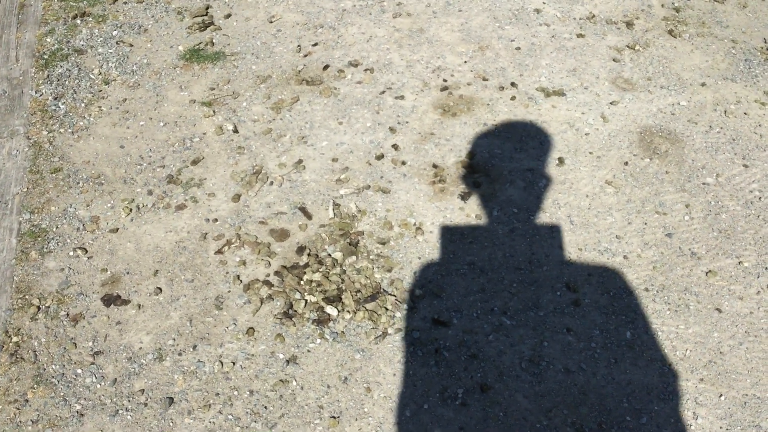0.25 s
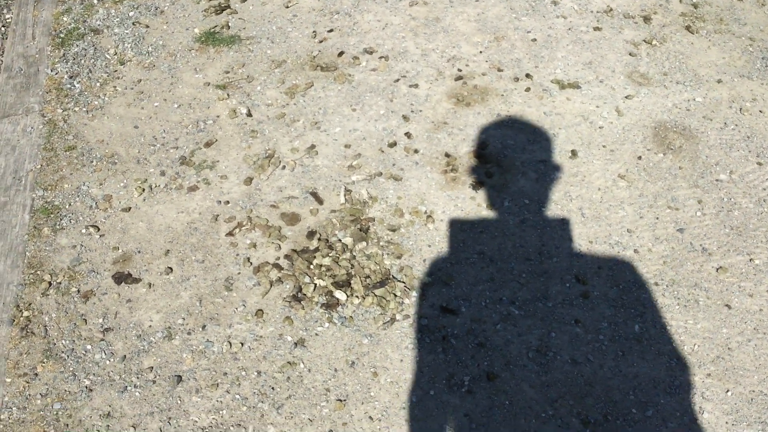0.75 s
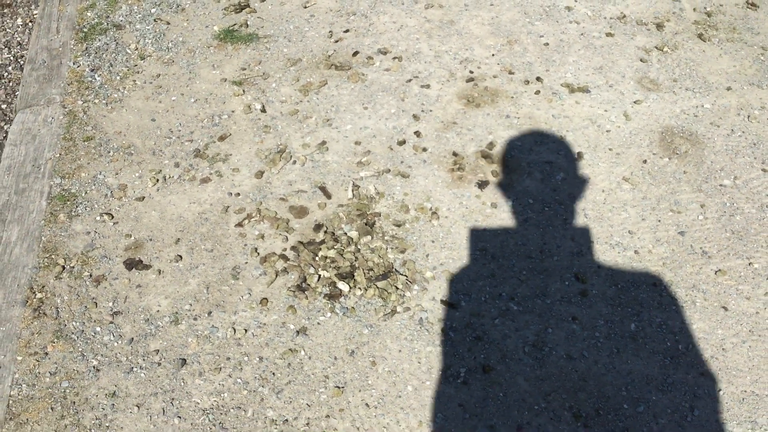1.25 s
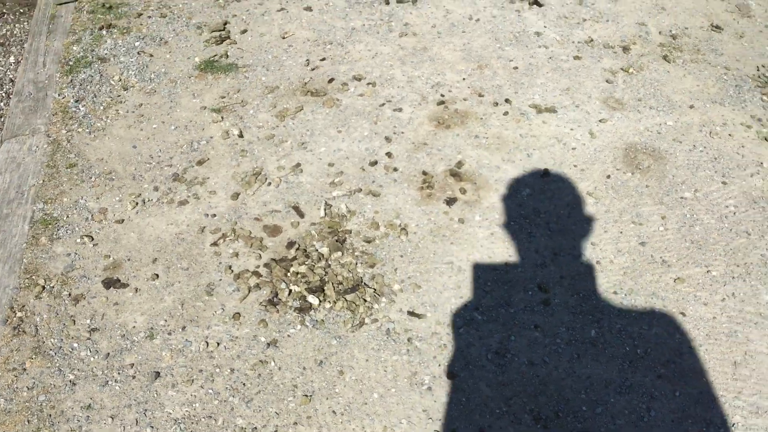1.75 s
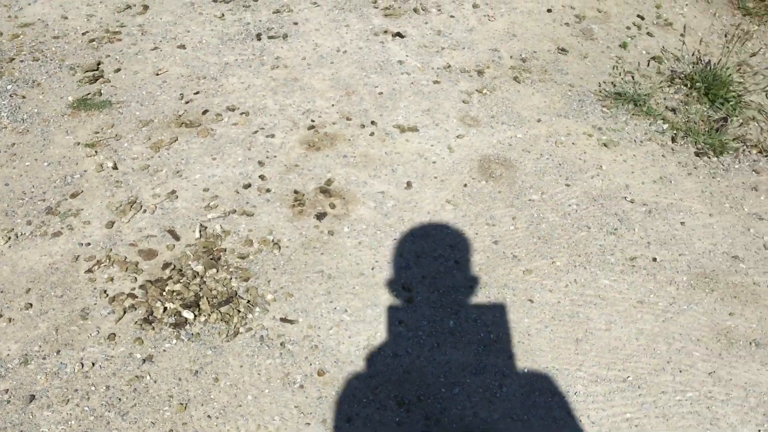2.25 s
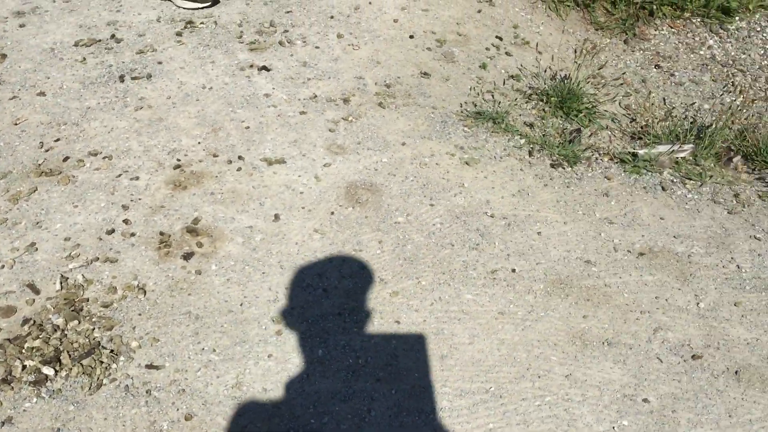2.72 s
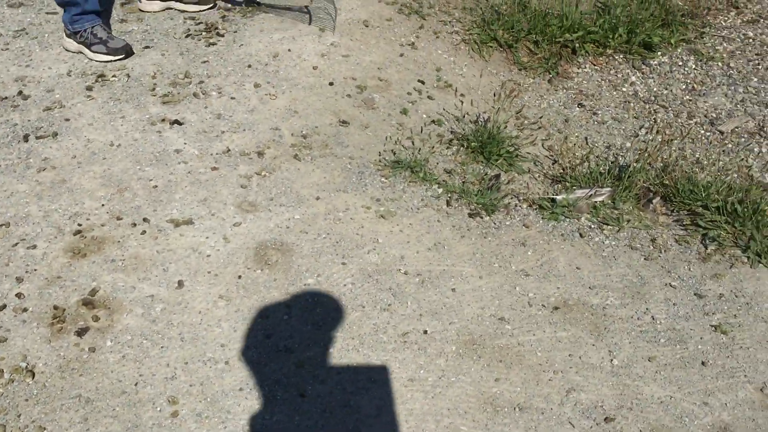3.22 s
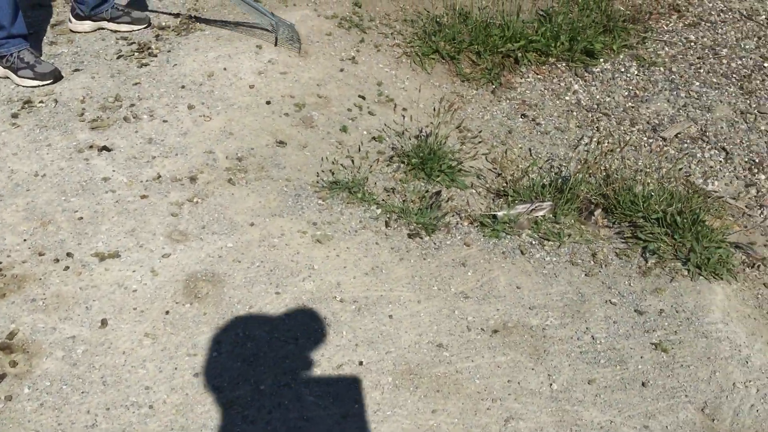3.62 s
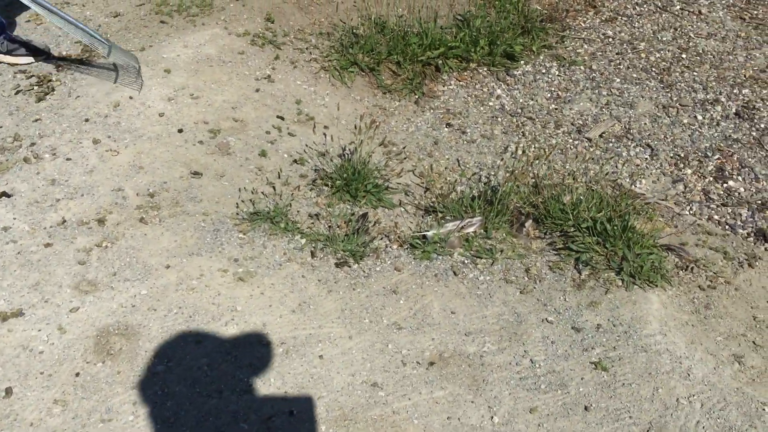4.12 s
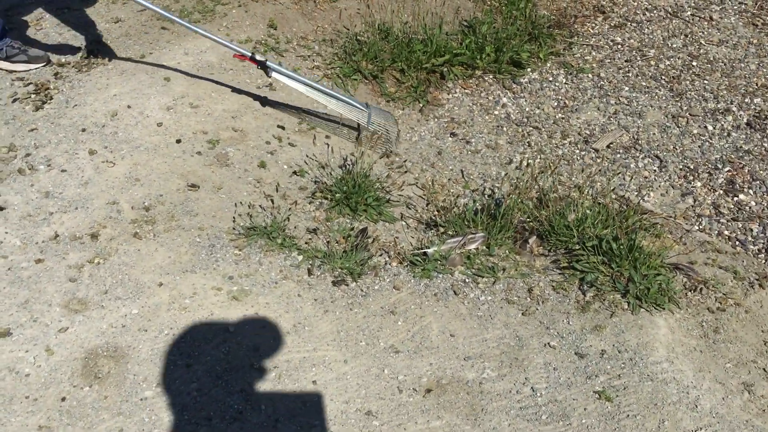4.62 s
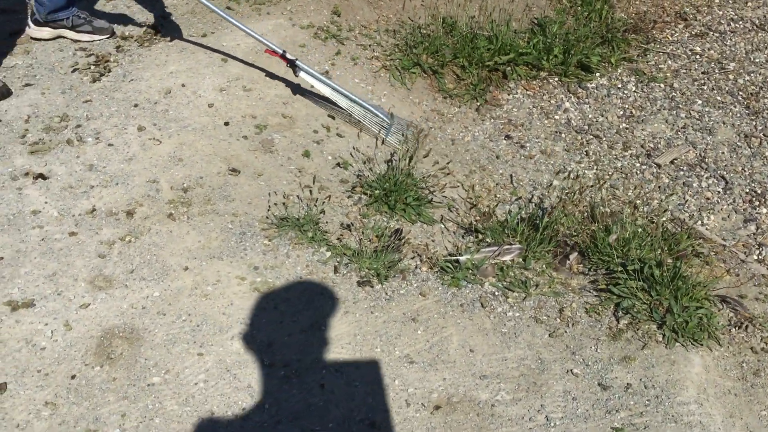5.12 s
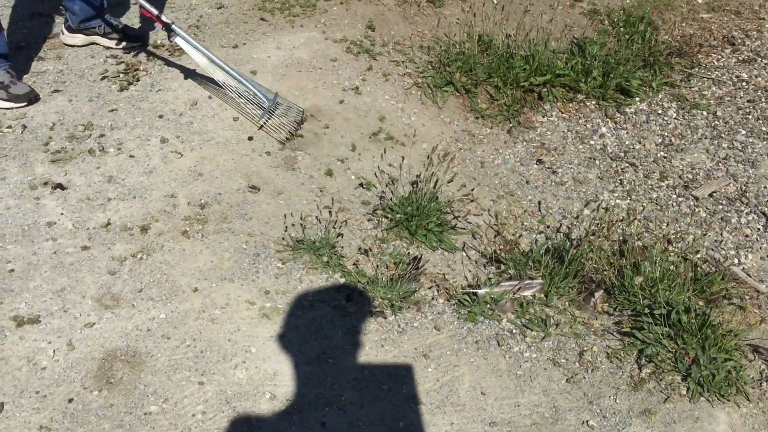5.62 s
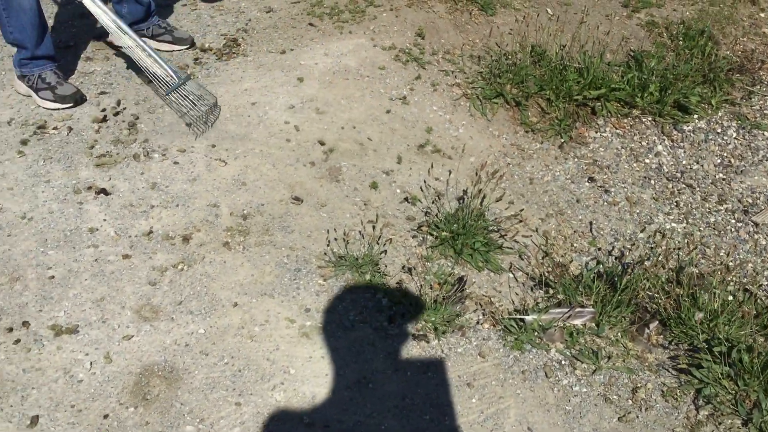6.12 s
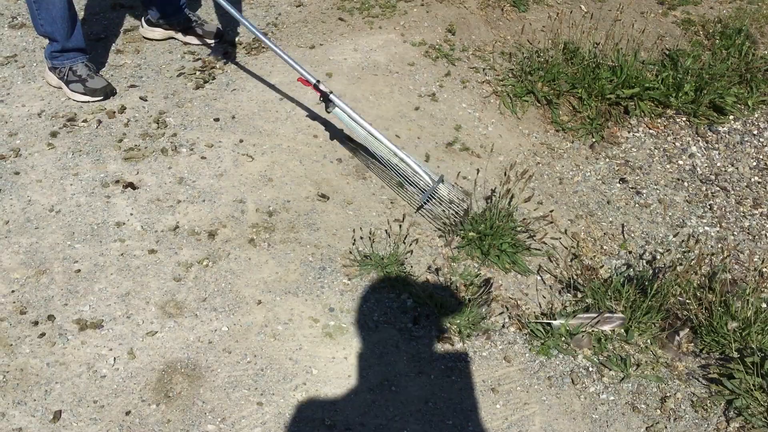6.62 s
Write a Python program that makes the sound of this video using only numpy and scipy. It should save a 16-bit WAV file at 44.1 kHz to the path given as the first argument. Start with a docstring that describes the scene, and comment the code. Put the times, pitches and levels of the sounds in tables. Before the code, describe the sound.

Outdoors on a dry gravel path, a steel fan rake is dragged in repeated gritty strokes, its thin tines rasping, chattering and ringing. Between pulls, pebbles drop and settle, stones click and shoes crunch briefly. The hand-held camera picks up dull bumps and a low wind rumble that strengthens late, when a faint distant whistle and one tiny bird chirp appear.

```python
"""A steel fan rake is pulled over a dry gravel path, stroke after stroke: impacts of grit and stones
excite drifting tine resonances, and loose tines chatter and sing. Pebbles ring as they roll, drop and settle.
Shoes crush grains, stones click, a foot thuds once, and the hand-held camera is bumped and knocks, as decaying
tones. Filtered noise gives open air and light wind, which grows towards the end; a distant whistle and one bird
chirp come late."""
import sys
import numpy as np
from scipy import signal
from scipy.fft import rfft, irfft, next_fast_len
from scipy.io import wavfile
from scipy.ndimage import uniform_filter1d, map_coordinates

SR = 44100
rng = np.random.default_rng(int(sys.argv[2]) if len(sys.argv) > 2 else 0)


def unload_audio(sound):
    """Save the sound as a 16-bit wav file, at the path given as the first command line argument."""
    columns = np.transpose(np.atleast_2d(sound))
    # keep every value between -1 and 1, then stretch to whole-number steps
    steps = np.round(np.clip(columns, -1, 1) * 32767)
    wavfile.write(sys.argv[1], SR, steps.astype(np.int16))


N = 302526  # length [samples]

# Pulls of the rake: (landing [s], bite [s], lift [s], start of coming to rest [s], light touch [dB],
# bite [dB], end of pull [dB], rattle [dB], fine sand re middle band [dB], coarse stones re middle band [dB])
RAKE_PULLS = [(-0.3, -0.05, 0.12, 0.44, -60, -47, -44, -63, -5, -2),
              (0.762, 1.065, 1.564, 1.833, -69.5, -59.5, -45, -61, -4.5, -2),
              (2.252, 2.453, 2.89, 3.3, -62.5, -55.5, -47, -67.5, -3.5, -4),
              (3.481, 3.653, 3.911, 4.38, -63, -53, -49.5, -63.5, -4.5, -2),
              (4.775, 5.178, 6.003, 6.24, -68, -55.5, -51, -73, -4.5, -0.5),
              (6.7, 7.0, 7.45, 7.28, -64, -55, -50, -66, -4.5, -1)]
# Bending resonances of the tines, one table a pull, the last shared by two:
# (centre [Hz], width [Hz], relative level [dB])
TINE_BEND_A = [(1710, 140, -4), (2340, 84, -2), (2910, 160, 3), (3940, 320, 0.5), (5470, 78, 0.5),
               (6520, 79, -1), (9300, 160, -7), (11340, 31, -4), (14100, 67, 2), (15500, 90, 9)]
TINE_BEND_B = [(1860, 50, -1), (2260, 42, -9), (2935, 150, 3.5), (3990, 200, 1), (5450, 50, 1.5),
               (6630, 290, -8), (9450, 45, -6), (10900, 120, -17), (14100, 180, -10), (14900, 79, -1)]
TINE_BEND_C = [(2860, 99, -5), (3640, 110, -1.5), (5630, 46, -7), (5970, 160, -1.5), (6470, 67, 1.5),
               (6960, 140, -16), (7560, 45, -22), (7700, 48, -5), (9300, 160, -4.5), (10760, 38, -7),
               (15400, 350, -2)]
TINE_BEND_D = [(2510, 28, -5), (2910, 53, 3.5), (4000, 130, -7), (5460, 43, -13), (6140, 73, -5),
               (8000, 36, -14), (8050, 47, -20), (9430, 190, -7.5), (14500, 170, -10), (15600, 240, -2)]
TINE_BEND_E = [(2440, 78, 3), (2630, 61, -19), (4595, 63, -1), (5730, 27, -2), (6080, 54, -1.5),
               (6480, 150, -2.5), (7030, 32, -9), (7600, 97, -2.5), (9330, 580, -6), (12800, 49, -39),
               (14300, 380, -9), (15200, 120, 3.5)]
# Spectrum of the gravel patch under each pull, the last shared by two: (frequency [Hz], relative gain [dB])
GRAVEL_PATCH_A = [(410, -45), (700, -16), (897, -23), (957, -36), (1100, -25), (1740, -12), (2900, -5),
                  (3180, -11), (4020, -10), (8450, -14), (15800, -9)]
GRAVEL_PATCH_B = [(410, -33), (700, -12), (983, -21.5), (1890, -2.5), (2070, -8), (2860, -2), (3970, -4.5),
                  (4340, -12), (5570, -5), (8450, -17.5), (15800, -18)]
GRAVEL_PATCH_C = [(410, -40), (700, -6.5), (851, -21), (1090, -11), (3720, -3), (6510, -11), (6950, -8),
                  (7610, -5), (8560, -10), (9380, -7), (15800, -14)]
GRAVEL_PATCH_D = [(410, -57), (700, -12), (862, -19.5), (1610, -8.5), (2550, -3.5), (3220, -6.5),
                  (5150, -17), (6100, -8.5), (8340, -14.5), (9260, -16.5), (15800, -19.5)]
GRAVEL_PATCH_E = [(410, -41), (700, -9.5), (1280, -11.5), (1380, -6.5), (2420, -2.5), (2860, -1),
                  (5350, -9), (5790, -30), (6860, -11), (12200, -7.5), (15800, -13.5)]
# Tines landing or snagging on a stone: (time [s], level [dB], hold [s])
TINE_SNAGS = [(0.105, -45.5, 0.02), (0.772, -63, 0.019), (0.845, -59, 0.0047), (0.965, -59, 0.012),
              (1.05, -52.5, 0.0075), (1.26, -49.5, 0.016), (1.428, -47, 0.022), (1.481, -46, 0.045),
              (2.254, -69, 0.011), (2.274, -59, 0.019), (2.512, -48.5, 0.02), (2.598, -49, 0.061),
              (3.488, -52.5, 0.008), (3.668, -48, 0.024), (3.778, -50.5, 0.017), (3.89, -53, 0.031),
              (4.78, -54.5, 0.011), (4.836, -60.5, 0.016), (4.917, -63, 0.024), (5.175, -57, 0.037),
              (5.83, -51, 0.0096), (5.895, -50.5, 0.028), (6.706, -56, 0.025)]
# Single tines that chatter and sing: (start [s], end [s], pitch [Hz], width [Hz], level re pull force [dB])
SINGING_TINES = [(0.1, 0.138, 2800, 250, 0), (0.99, 1.302, 1740, 300, -2.5), (1.46, 1.542, 3840, 260, -1.5),
                 (1.547, 1.877, 6620, 200, -0.5), (1.57, 1.814, 3030, 120, 0.5), (2.25, 2.78, 6540, 90, -4),
                 (2.26, 2.495, 5860, 160, -3.5), (2.254, 2.315, 3560, 200, -4),
                 (2.4, 2.65, 3920, 170, -2.5), (2.868, 3.2, 6060, 130, -25), (3.849, 3.927, 2700, 395, 3.5),
                 (4.014, 4.33, 6650, 410, -9), (5.172, 5.5, 4720, 99.4, -22), (5.206, 5.55, 5340, 60, -9.5),
                 (5.45, 6.064, 5485, 50, -6), (5.82, 6.016, 7030, 100, -3)]
# Large eddies buffeting the microphone: (time [s], relative level [dB])
BUFFET_LEVELS = [(0.0, -60), (0.05, -65), (0.11, -46), (0.5, -54), (0.61, -47.5), (0.63, -60.5),
                 (1.09, -45.5), (1.13, -61.5), (1.32, -51.5), (2.18, -49), (2.23, -59), (2.39, -43),
                 (2.46, -51.5), (4.05, -56), (4.2, -42), (4.41, -55), (5.56, -53), (5.73, -58), (5.77, -41),
                 (5.86, -53), (5.94, -42), (6.32, -49.5), (6.42, -43.5), (6.86, -45.5)]
# Small eddies fluttering at the microphone: (time [s], relative level [dB])
FLUTTER_LEVELS = [(0.0, -62.5), (0.34, -60), (1.66, -60.5), (1.83, -57), (3.46, -59.5), (5.54, -59.5),
                  (6.0, -48), (6.29, -54), (6.65, -49), (6.86, -53)]
# Spectrum of the buffeting: (frequency [Hz], relative gain [dB])
BUFFET_SPECTRUM = [(20, -48), (35, -19.5), (58, -1.5), (92, 0.5), (125, -3), (170, -12.5), (260, -27),
                   (500, -80)]
# Spectrum of the flutter: (frequency [Hz], relative gain [dB])
FLUTTER_SPECTRUM = [(80, -30.5), (140, -5), (185, -0.5), (260, -8.5), (400, -16), (650, -22), (1200, -37.5),
                    (3000, -72)]
# Spectrum of the open-air background: (frequency [Hz], relative gain [dB])
AIR_SPECTRUM = [(100, 7.5), (400, -2.5), (750, 4.5), (1200, -4.5), (2600, -6), (4000, -17), (8000, -21.5),
                (15500, -34)]
# Shoes shifting on the gravel: (start [s], end [s], relative level [dB])
SHOE_SHIFTS = [(0.544, 0.73, -80), (1.995, 2.07, -73), (2.076, 2.138, -65.5), (2.153, 2.229, -66.5),
               (2.934, 3.07, -66.5), (3.11, 3.204, -73), (3.39, 3.472, -71), (4.696, 4.777, -71),
               (6.53, 6.688, -77.5)]
# Spectrum of crushed grains and cracking stones: (frequency [Hz], relative gain [dB])
CRUNCH_SPECTRUM = [(400, -10), (1200, 1), (2300, 4), (3300, -1), (4500, -12.5), (6300, -13.5),
                   (9000, -25.5), (15500, -25.5)]
# Clicks of loose stones: (time [s], relative peak [dB], pitch [Hz], treble boost of the crack [dB])
STONE_CLICKS = [(0.5434, -58, 1410, -1), (0.5762, -54, 2220, 9), (2.0082, -52, 1240, 3),
                (2.078, -50, 2680, -1), (2.091, -49, 2740, -9), (2.176, -44, 3100, 1),
                (2.1973, -46, 2570, 11), (2.2156, -52, 2660, 0), (2.225, -53, 2710, 4),
                (3.1092, -49, 2050, -10), (3.1737, -52, 1720, 5), (3.4216, -53, 1750, 10),
                (4.352, -56, 1940, 16), (4.6923, -49, 2480, -10), (6.077, -47, 1990, 13),
                (6.221, -59, 2150, 7), (6.4009, -56, 2780, 13), (6.4974, -55, 1430, 16),
                (6.5701, -51.5, 2090, -10), (6.5948, -52, 1890, -18), (6.614, -51.5, 1980, -9),
                (6.662, -53, 1300, -2)]
# Dull bumps of the hand on the camera: (time [s], relative peak [dB], settled pitch [Hz])
HAND_BUMPS = [(0.996, -37.5, 132), (1.747, -41.5, 134), (1.968, -29.5, 193), (2.403, -38, 197),
              (2.541, -37.5, 161), (3.083, -31, 175), (3.203, -41.5, 209), (3.344, -39.5, 183),
              (3.983, -31, 177.5), (4.125, -35.5, 124), (4.589, -42, 144), (5.661, -37, 178),
              (5.685, -42, 218), (5.943, -36, 152), (6.403, -30.5, 120)]
# Dull knocks of the camera shell, and one thud of a foot (2.157 s):
# (time [s], peak before band limiting [dB], pitch [Hz])
DULL_KNOCKS = [(1.967, -48, 660), (2.157, -45, 606), (3.975, -41.5, 880), (4.045, -38, 680),
               (4.696, -44, 826), (5.556, -36, 695), (5.568, -32.5, 597), (5.578, -42, 684)]
# Bands of a faint distant whistle: (start [s], end [s], centre [Hz], half bandwidth setting [Hz], level [dB])
WHISTLE_BANDS = [(6.22, 6.508, 4380, 560, -75), (6.22, 6.48, 2920, 260, -73)]
# Path of the bird's chirp: (time [s], mean pitch [Hz], level [dB])
BIRD_CHIRP = [(6.606, 4150, -85), (6.614, 4440, -67), (6.621, 4520, -60), (6.628, 4650, -77),
              (6.655, 4600, -81)]

TOP_HZ = 15830  # upper band limit
BITE_S, LIFT_S, STILL_S = 0.085, 0.058, 0.077  # the tines dig in, spring free, come to rest
RATTLE_DB_PER_S = 31  # the rattle fades while the rake is in the air
AIRBORNE_SAND_DB, AIRBORNE_STONES_DB = -1, 0.5  # off the ground the fine hiss goes first
SNAG_ATTACK_S, SNAG_T60 = 0.003, 0.054  # rise constant and 60 dB decay time [s]


def amp(db):
    """Logarithmic level: decibels become an amplitude ratio."""
    return 10 ** (np.asarray(db) / 20)


def unit(x):
    """Normalisation: the root-mean-square amplitude becomes 1."""
    return x / np.sqrt(np.mean(x ** 2) + 1e-20)


def shape(points, hz):
    """Spectral envelope: gain through (Hz, dB) points, interpolated on a logarithmic axis."""
    f, db = np.transpose(points)
    return amp(np.interp(np.log(hz + 1), np.log(f), db))


def curves(rows):
    """Linear interpolation: one value per sample for each column after the time."""
    s, *cols = np.transpose(rows)
    return [np.interp(np.arange(N) / SR, s, c) for c in cols]


def during(start, end, fade=0.0085):
    """Time window: full between start and end, with a linear fade [s] outside each edge."""
    t = np.arange(N) / SR
    return np.clip(np.minimum(t - start, end - t) / fade + 1, 0, 1)


def wobble(rate):
    """Slow random modulation: a smooth curve through rate random knots a second."""
    knots = rng.standard_normal(int(N * rate / SR) + 4)
    return map_coordinates(knots, [np.arange(N) * rate / SR], order=2)


def colour(x, gain, size=8192):
    """Minimum-phase filtering: folding the cepstrum gives a causal response of the wanted gain."""
    cepstrum = irfft(np.log(np.maximum(gain(np.fft.rfftfreq(size, 1 / SR)), 1e-6)))
    cepstrum[1:size // 2] *= 2
    cepstrum[size // 2 + 1:] = 0
    response = irfft(np.exp(rfft(cepstrum)))
    return signal.oaconvolve(x, response)[:len(x)]


def resonance(hz, centre_hz, width_hz):
    """Damped oscillator: gain against frequency, 1 at the centre."""
    return hz * width_hz / np.hypot(centre_hz ** 2 - hz ** 2, hz * width_hz)


def ringing(drive, pitch_hz, width_hz):
    """Driven resonance: a one-pole decay in a frame turning at the gliding pitch, rms 1."""
    turn = np.exp(2j * np.pi * np.cumsum(pitch_hz) / SR)
    decay = np.exp(-np.pi * width_hz / SR)
    envelope = signal.lfilter([1], [1, -decay], drive / turn)
    return unit((turn * envelope).real)


def register(x, low_hz, high_hz, order=14):
    """Band-pass filtering: keeps the part of a sound between two frequencies."""
    size = next_fast_len(len(x) + 2048)
    hz = np.fft.rfftfreq(size, 1 / SR) + 1
    return irfft(rfft(x, size) / (1 + (low_hz / hz) ** order) / (1 + (hz / high_hz) ** order), size)[:len(x)]


def patchy(x, depth_db, size=512):
    """Shifting weak resonances: random gain in patches of frequency and time."""
    z = signal.stft(x, nperseg=size)[2]
    field = uniform_filter1d(rng.standard_normal(z.shape), size=3, axis=0)
    field = uniform_filter1d(field, size=14, axis=1)
    return signal.istft(z * amp(depth_db * unit(field)), nperseg=size)[1][:len(x)]


def contacts(rate, spread_db):
    """Random impacts: independent signed pulses of very unequal size, rate a second on average."""
    hit = rng.random(N) < rate / SR
    sign = rng.choice([-1, 1], N)
    return unit(hit * sign * amp(spread_db * np.minimum(rng.standard_normal(N), 2)))


def pebbles(rate, pitch_hz, spread, cycles, size_db, size=256):
    """Colliding pebbles: each random impact starts a short damped tone, losing 60 dB per given cycles."""
    start = np.flatnonzero(rng.random(N) < rate / SR)
    chance = np.clip(rng.standard_normal((N, 2))[start], -2, 2)  # columns: pitch, loudness
    turns = pitch_hz * np.exp(spread * chance[:, :1]) * np.arange(size) / SR
    rings = np.sin(2 * np.pi * turns) * amp(size_db * chance[:, 1:] - 60 * turns / cycles)
    places = start[:, None] + np.arange(size)
    return unit(np.bincount(places.ravel(), rings.ravel(), N + size)[:N])


def add(track, s, sound):
    """Superposition: mixes a sound in at time s."""
    part = track[max(round(s * SR), 0):][:len(sound)]
    part += sound[:len(part)]


def pull_force(pull):
    """Contact force: touch, bite, a changing pull, quick lift and fading rattle; snags jolt the tines on top."""
    land, bite, lift, still, touch_db, bite_db, pull_db, rattle_db = pull[:8]
    t, snags = np.arange(N) / SR, np.zeros(N)
    press_db, = curves([(bite - BITE_S, touch_db), (bite, bite_db), (lift, pull_db)])
    in_air_s = np.maximum(t - lift, 0)
    grip = np.exp(-(in_air_s / LIFT_S) ** 1.14)
    scrape_db = grip * press_db + (1 - grip) * (rattle_db - RATTLE_DB_PER_S * in_air_s)
    resting = np.clip((still + STILL_S - t) / STILL_S, 0, 1) ** 2
    age = t[:SR // 4]
    for s, db, held_s in TINE_SNAGS:
        decay = amp(db - 60 * np.maximum(age - held_s, 0) / SNAG_T60)
        add(snags, s, decay * (1 - np.exp(-age / SNAG_ATTACK_S)))
    return np.hypot(amp(scrape_db), snags) * resting * during(land, still + STILL_S, fade=0.0026)


def rake(forces, ring_db=-11, pebble_db=-7, clump_db=1.5, swell_db=3, flex=0.0066, patchy_db=3, uneven_db=1):
    """Impact excitation of bars: clumped grit strikes sliding tines, whose resonances swell and drift."""
    out = np.zeros(N)
    clumps = amp(clump_db * wobble(130) + uneven_db * wobble(28))
    grit = unit((contacts(rate=6000, spread_db=3.5) + 0.62 * rng.standard_normal(N)) * clumps)
    rasp = patchy(grit, patchy_db)
    rolling = pebbles(rate=1100, pitch_hz=4152, spread=0.376, cycles=170, size_db=5.5)
    rolling = amp(pebble_db) * clumps * rolling
    digging, signs = wobble(22), rng.choice([-1, 1], N)
    bends = [TINE_BEND_A, TINE_BEND_B, TINE_BEND_C, TINE_BEND_D, TINE_BEND_E, TINE_BEND_E]
    grounds = [GRAVEL_PATCH_A, GRAVEL_PATCH_B, GRAVEL_PATCH_C, GRAVEL_PATCH_D, GRAVEL_PATCH_E, GRAVEL_PATCH_E]
    for pull, force, bend, ground in zip(RAKE_PULLS, forces, bends, grounds):
        lift, (sand_db, stones_db) = pull[2], pull[8:]
        on = np.flatnonzero(force)
        airborne = np.clip((on / SR - lift) / LIFT_S, 0, 1)
        steel = rolling[on] + unit(colour(rasp[on], lambda hz: shape(ground, hz)))
        for centre_hz, width_hz, db in bend:
            # random time shifts give every tine its own grains and its own bending
            swell, drift, own = (v[(on + rng.integers(N)) % N] for v in (digging, digging, signs))
            ring = ringing(grit[on] * own, centre_hz * (1 + flex * drift), width_hz)
            steel += amp(db + ring_db + swell_db * swell) * np.sqrt(width_hz / 100) * ring
        # stones, grit and sand each sound in their own register
        bands = [(484, 3340, stones_db + AIRBORNE_STONES_DB * airborne),
                 (3405, 7780, 0),
                 (7900, 15240, sand_db + AIRBORNE_SAND_DB * airborne)]
        for low_hz, high_hz, share_db in bands:
            out[on] += force[on] * amp(share_db) * unit(register(steel, low_hz, high_hz))
    return out


def settling(level_db=-81):
    """Granular relaxation: disturbed grains keep dropping into place, heard between the strokes."""
    return amp(level_db) * pebbles(rate=290, pitch_hz=4140, spread=0.585, cycles=25, size_db=2)


def wind(buffet_db=1, flutter_db=0.5, lump_db=1.4, gust_db=0.83):
    """Turbulent pressure: eddies buffet the microphone in small gusts; smaller ones flutter above them."""
    (low_db,), (high_db,) = curves(BUFFET_LEVELS), curves(FLUTTER_LEVELS)
    lumps = lump_db * wobble(24) + gust_db * wobble(7)
    large = rng.standard_normal(N) * amp(lumps)
    small = rng.standard_normal(N) * amp(lumps + 1.94 * wobble(45))
    buffet = unit(colour(large, lambda hz: shape(BUFFET_SPECTRUM, hz)))
    flutter = unit(colour(small, lambda hz: shape(FLUTTER_SPECTRUM, hz)))
    return amp(low_db + buffet_db) * buffet + amp(high_db + flutter_db) * flutter


def open_air(level_db=-68):
    """Diffuse background: steady noise with a falling spectrum makes a faint hush."""
    return amp(level_db) * unit(colour(rng.standard_normal(N), lambda hz: shape(AIR_SPECTRUM, hz)))


def tines(force, flex=0.0058):
    """Repeated-impact resonance: loose tines chatter against the spreader bar, each near its own pitch."""
    out, taps, drift = np.zeros(N), contacts(rate=720, spread_db=3.5), wobble(25)
    for start, end, pitch_hz, width_hz, db in SINGING_TINES:
        window = during(start, end, fade=0.008)
        on = window > 0
        ring = ringing(taps[on], pitch_hz * (1 + flex * drift[on]), width_hz)
        out[on] += amp(db) * window[on] * register(ring, .8 * pitch_hz, 1.25 * pitch_hz)
    return force * out


def shedding(level_db=-68, fade_db_per_s=35):
    """Decaying impact train: small stones roll on and drop off the tines after each lift."""
    t, falling = np.arange(N) / SR, np.zeros(N)
    for _, _, lift, *_ in RAKE_PULLS:
        falling += (t > lift) * amp(level_db - fade_db_per_s * np.abs(t - lift))
    return falling * pebbles(rate=140, pitch_hz=2800, spread=0.47, cycles=20, size_db=3.5)


def shoes(level_db=1, sole_db=-1, sole_hz=580, sole_width_hz=500):
    """Granular crushing: many small impacts under shifting weight also excite a dull sole resonance."""
    weight = sum(amp(db + level_db) * during(start, end) for start, end, db in SHOE_SHIFTS)
    crush = contacts(rate=1500, spread_db=2.5) * amp(2.5 * wobble(120))
    sole = unit(colour(crush, lambda hz: resonance(hz, sole_hz, sole_width_hz) ** 2))
    grains = unit(colour(crush, lambda hz: shape(CRUNCH_SPECTRUM, hz)))
    return weight * (grains + amp(sole_db) * sole)


def clicks(click_t60=0.014, ring_t60=0.049, ring_db=-11, level_db=1):
    """Collision of solids: a stone cracks as a noise burst and rings as a brief damped tone."""
    out, t = np.zeros(N), np.arange(SR // 20) / SR
    for s, db, pitch_hz, treble_db in STONE_CLICKS:
        tone = lambda hz: shape(CRUNCH_SPECTRUM, hz) * shape([(3000, 0), (6500, treble_db)], hz)
        crack = colour(rng.standard_normal(len(t)) * amp(-60 * t / click_t60), tone)
        ring = np.sin(2 * np.pi * pitch_hz * t) * amp(ring_db - 60 * t / ring_t60)
        click = crack / np.abs(crack).max() + ring
        add(out, s, amp(db + level_db) * click / np.abs(click).max())
    return out


def bumps(cycles=7.9, rise=1.29, snap=1.6, snap_s=0.0028, level_db=-1.5):
    """Contact stiffness: a soft bump on the camera rings for a few cycles, sagging as the contact relaxes."""
    out, t = np.zeros(N), np.arange(SR // 10) / SR
    for s, db, pitch_hz in HAND_BUMPS:
        turns = np.cumsum(pitch_hz * (1 + snap * np.exp(-t / snap_s))) / SR
        onset = 1 - np.exp(-(turns / rise) ** 4)
        blow = np.sin(2 * np.pi * turns) * onset * amp(-60 * turns / cycles)
        add(out, s, amp(db + level_db) * blow / np.abs(blow).max())
    return out


def dull_knocks(cycles=8.6, rise=0.6, crack=0.63):
    """Damped vibration: camera shell knocks and one foot thud, a few cycles plus noise around one pitch."""
    out, t = np.zeros(N), np.arange(SR // 10) / SR
    for s, db, pitch_hz in DULL_KNOCKS:
        turns = t * pitch_hz
        noise = rng.standard_normal(len(t))
        noise = unit(colour(noise, lambda hz: resonance(hz, pitch_hz, 1.6 * pitch_hz) ** 2))
        onset = 1 - np.exp(-(turns / rise) ** 2)
        knock = (np.sin(2 * np.pi * turns) + crack * noise) * onset * amp(-60 * turns / cycles)
        add(out, s, amp(db) * knock / np.abs(knock).max())
    return register(out, 240, 2260, order=6)


def whistle():
    """Narrow-band noise: resonant filtering gives a breathy distant whistle that swells and fades."""
    out = np.zeros(N)
    for start, end, centre_hz, width_hz, db in WHISTLE_BANDS:
        tone = unit(colour(rng.standard_normal(SR), lambda hz: resonance(hz, centre_hz, 2 * width_hz) ** 4))
        swell = np.hanning(round((end - start) * SR))
        add(out, start, amp(db) * swell * tone[:len(swell)])
    return out


def bird():
    """Frequency modulation: one mostly rising chirp is a sine with a slightly unsteady pitch."""
    pitch_hz, db = curves(BIRD_CHIRP)
    chirp = np.sin(2 * np.pi * np.cumsum(pitch_hz + 40 * wobble(400)) / SR)
    return amp(db) * chirp * during(BIRD_CHIRP[0][0], BIRD_CHIRP[-1][0])


def scene():
    """Linear superposition: rake, stones, feet, camera handling and surroundings add at one microphone."""
    forces = [pull_force(pull) for pull in RAKE_PULLS]
    gravel = rake(forces) + settling() + tines(sum(forces)) + shedding() + shoes() + clicks()
    dull_blows = bumps() + dull_knocks()
    surroundings = wind() + open_air() + whistle() + bird()
    return (gravel + dull_blows + surroundings)[None]


def record(dry, bass_cut_hz=32):
    """Band limiting: the camera drops the deepest bass and keeps nothing above its upper limit."""
    size = next_fast_len(N + SR // 4)
    hz = np.fft.rfftfreq(size, 1 / SR) + 1
    gain = (hz < TOP_HZ) / (1 + (bass_cut_hz / hz) ** 6)
    return irfft(rfft(dry, size) * gain, size)[:, :N]


dry = scene()
out = record(dry)
unload_audio(out)
```